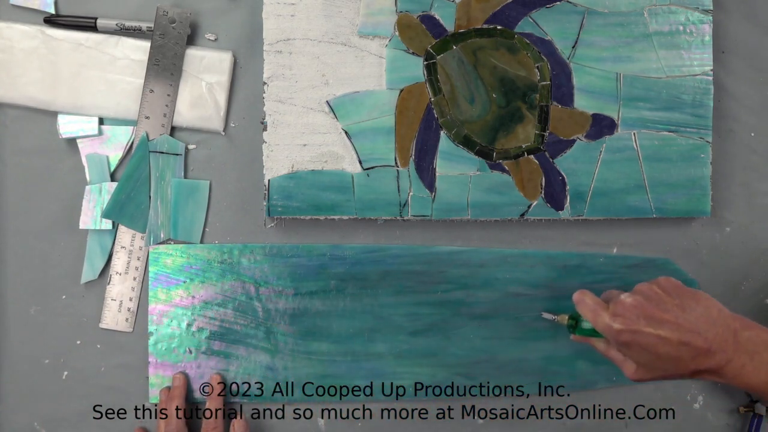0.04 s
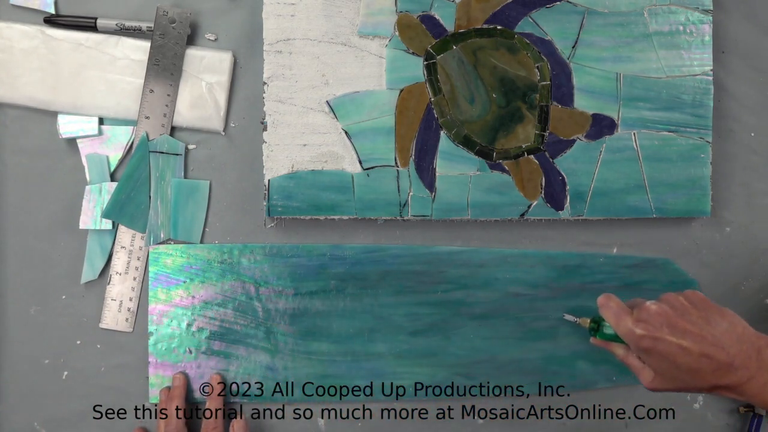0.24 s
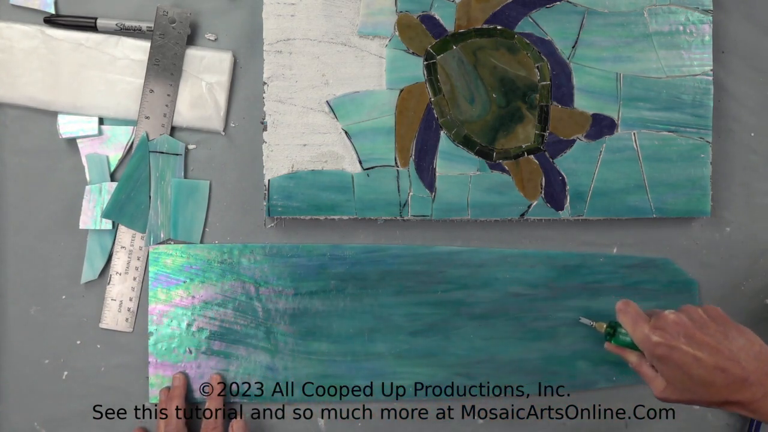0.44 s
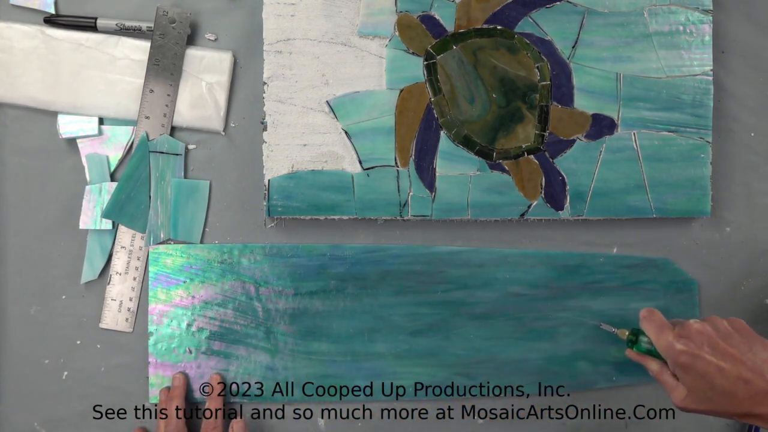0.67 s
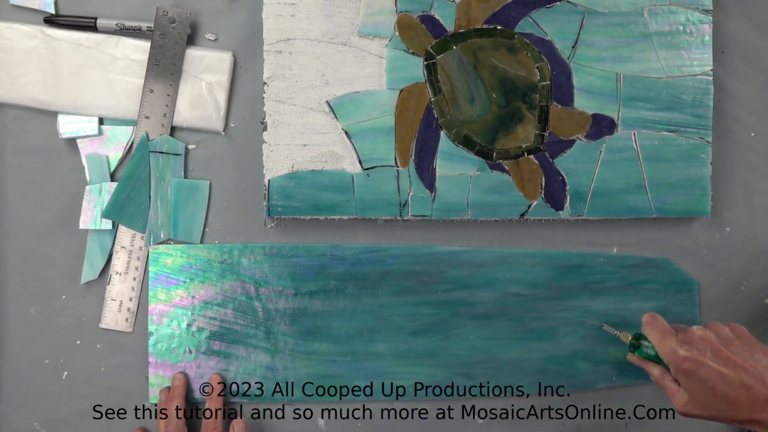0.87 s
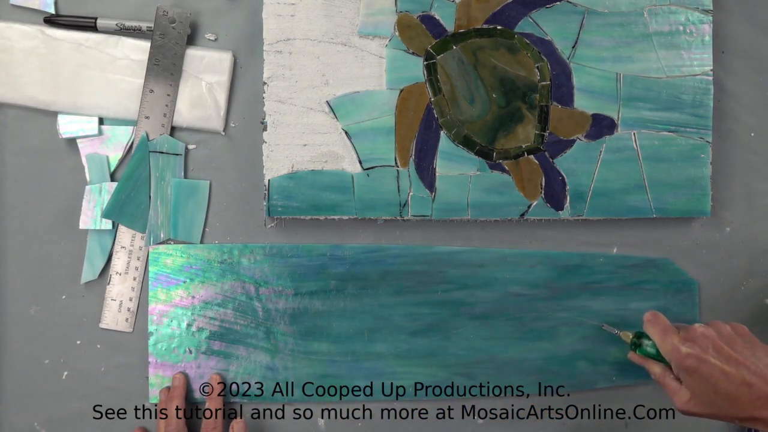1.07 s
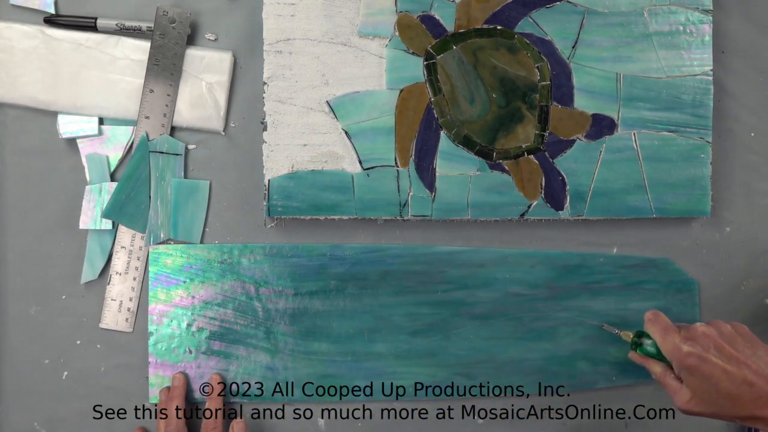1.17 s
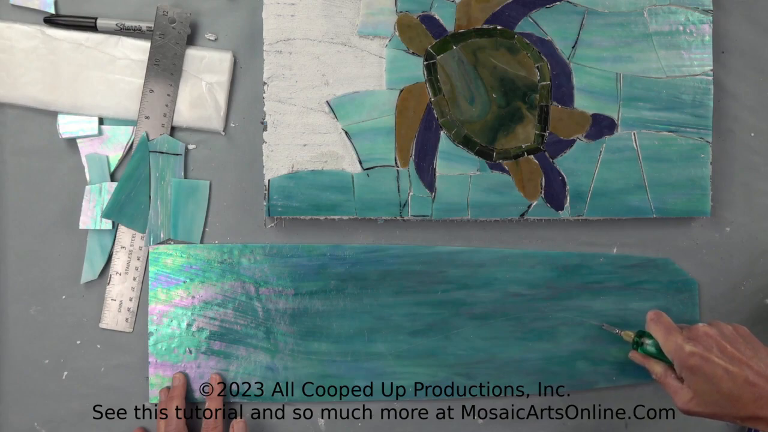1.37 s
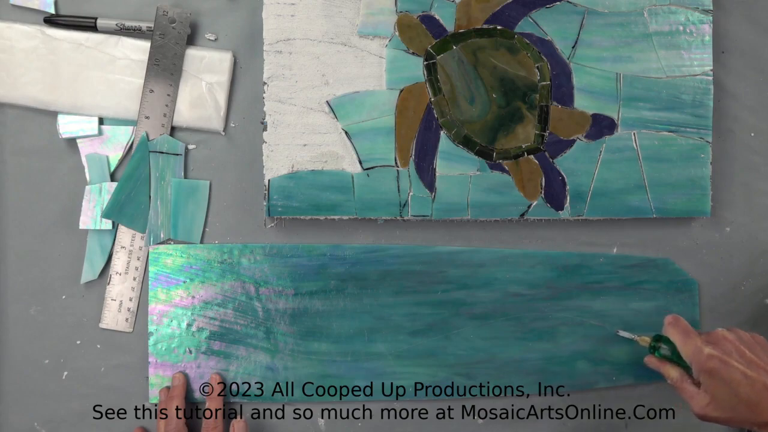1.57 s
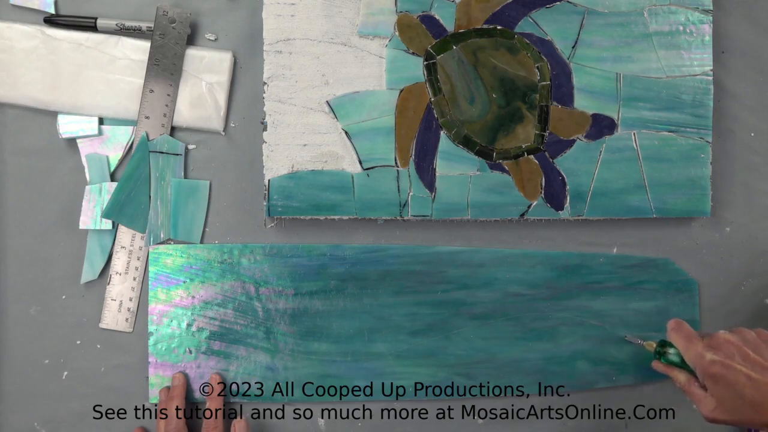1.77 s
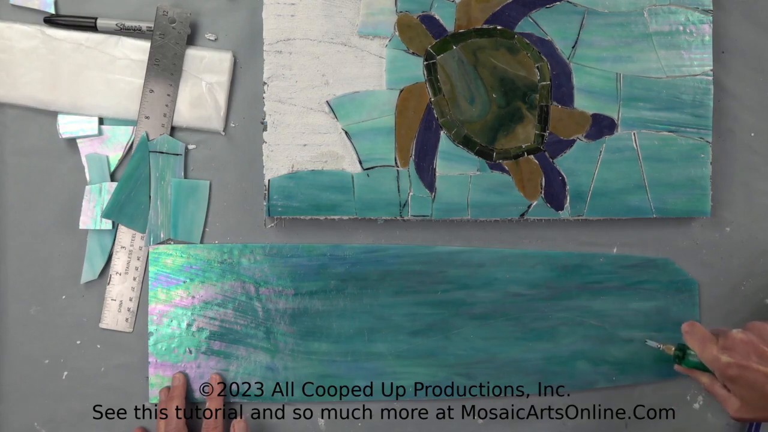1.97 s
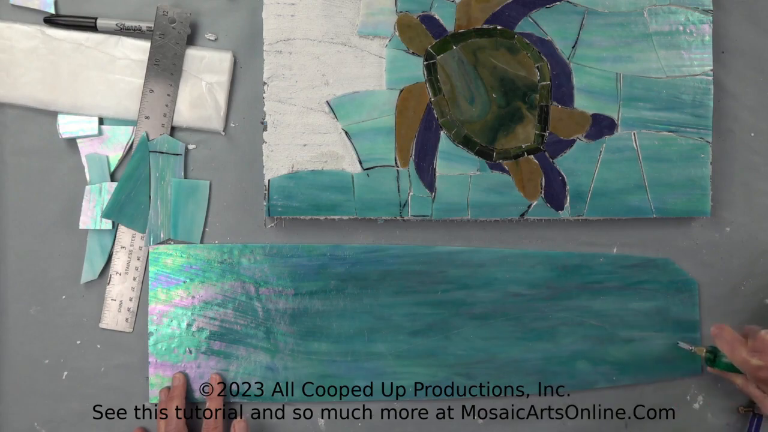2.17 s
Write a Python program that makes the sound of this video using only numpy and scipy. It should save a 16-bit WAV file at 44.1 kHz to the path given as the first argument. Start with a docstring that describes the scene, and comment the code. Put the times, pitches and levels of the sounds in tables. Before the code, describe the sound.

A cutting wheel scratches across thick glass, crackling and hissing, pausing, then scraping on with snaps

```python
"""A glass cutter's wheel is drawn over a thick textured sheet on a workbench, heard close in a small room.
The first stroke opens with fine splintering: dense random cracks ring a sheet whose modes keep shifting weight.
It snaps once over a bump, stops with a thud of the bench, and in the pause a hand slides as filtered noise.
The second stroke is short and full of snapping noise bursts; the third runs straight on from it and grows,
with gliding narrow resonances and two sine squeaks near the end. Room air and a faint hum lie beneath."""
import sys
import numpy as np
from scipy import signal
from scipy.fft import rfft, irfft
from scipy.io import wavfile

SR = 44100
rng = np.random.default_rng(int(sys.argv[2]) if len(sys.argv) > 2 else 0)


def unload_audio(sound):
    """Save the sound as a 16-bit wav file, at the path given as the first command line argument."""
    columns = np.transpose(np.atleast_2d(sound))
    # keep every value between -1 and 1, then stretch to whole-number steps
    steps = np.round(np.clip(columns, -1, 1) * 32767)
    wavfile.write(sys.argv[1], SR, steps.astype(np.int16))


N = 97902


def undb(db):
    """Decibels to gain."""
    return 10 ** (np.asarray(db) / 20)


def unit(x):
    """Scale to rms 1."""
    return x / np.sqrt(np.mean(x ** 2))


def clock():
    """Time of every sample in seconds."""
    return np.arange(N) / SR


def bins(size=8192):
    """Frequency of every spectral bin in Hz, kept above zero for logarithms."""
    return np.maximum(np.arange(size + 1) * SR / (2 * size), 1)


def curve(rows):
    """Gain along (s, dB) points, silent outside them."""
    s, db = np.array(rows, float).T
    return undb(np.interp(clock(), s, db, left=-200, right=-200))


def colour(rows):
    """Relative dB in every bin, drawn through (Hz, dB) points on a logarithmic frequency axis."""
    hz, db = np.array(rows, float).T
    return np.interp(np.log(bins()), np.log(hz), db)


def shape(x, db):
    """Minimum-phase filter with the given relative dB per bin; white noise keeps its level."""
    cepstrum = irfft(np.log(unit(undb(db)) + 1e-9))
    half = len(db) - 1
    # folding the cepstrum onto positive time makes the filter causal
    cepstrum[1:half] *= 2
    cepstrum[half + 1:] = 0
    response = irfft(np.exp(rfft(cepstrum)))[:half]
    return signal.fftconvolve(x, response)[:N]


def noise(rows):
    """Steady noise of a given colour, near rms 1."""
    return shape(rng.standard_normal(N), colour(rows))


def walk(rate):
    """Smooth random motion of rms 1, with `rate` new values a second."""
    return unit(np.interp(clock() * rate, np.arange(N), rng.standard_normal(N)))


def fade(start, decay):
    """Sudden start, then exponential decay with a time constant in seconds."""
    age = clock() - start
    return (age >= 0) * np.exp(-np.abs(age) / decay)


# Pressure of the wheel in strokes one, two and three. Each row: time in seconds, level in dB.
PRESSURE_1 = [(0, -30.5), (.07, -33), (.12, -30), (.33, -30), (.5, -29.5), (.62, -28.5), (.722, -26),
              (.738, -42), (.76, -80)]
PRESSURE_2 = [(1.541, -35.5), (1.556, -26.5), (1.566, -23.5), (1.595, -25), (1.62, -27), (1.654, -31.5),
              (1.671, -40), (1.685, -51), (1.74, -37), (1.8, -49), (1.821, -53)]
PRESSURE_3 = [(1.821, -34), (1.838, -34), (1.857, -29), (1.92, -27), (2.02, -25), (2.055, -26.5),
              (2.108, -26), (2.17, -25), (2.22, -24.5)]
# Fine splintering as the score starts. Each row: time in seconds, level in dB.
SPLINTER_LEVEL = [(0, -26), (.085, -28.5), (.125, -43), (.2, -67)]
# Colour of the splintering. Each row: frequency in Hz, relative level in dB.
SPLINTER_COLOUR = [(1900,-21),(2370,-16),(3000,-18.5),(6500,-4.5),(7300,-1),(8400,4),(9700,-4),(11000,-2.5),(11800,-14),(16000,-27)]
# Colour of the rolling wheel's rumble. Each row: frequency in Hz, relative level in dB.
RUMBLE_COLOUR = [(20, 7), (45, -18.5), (62, 7.5), (90, 4), (160, -21.5), (300, -35.5), (800, -50)]
RUMBLE_DB = -19  # against the fractures
JUDDER_DB, JUDDER_PER_S = 1.03, 130  # rms unevenness of the pressure, new values a second


def scoring():
    """Pressure drives fractures that ring the sheet from spot to spot, over the rumble of the rolling wheel."""
    out = curve(SPLINTER_LEVEL) * shape(fractures(), colour(SPLINTER_COLOUR))
    spots = places()
    for stroke, rows in enumerate([PRESSURE_1, PRESSURE_2, PRESSURE_3]):
        pressure = curve(rows) * undb(JUDDER_DB * walk(JUDDER_PER_S))
        glass = sum(shape(spot * pressure * fractures(), sheet(stroke, vary=True)) for spot in spots)
        rumble = undb(RUMBLE_DB) * pressure * noise(RUMBLE_COLOUR)
        out = out + glass + rumble
    return out


FRACTURES_PER_S, FRACTURE_SPREAD_DB = 9000, 3.5


def fractures():
    """Dense single-sample cracks of random timing, sign and size, scaled to rms 1."""
    hits = rng.random(N) < FRACTURES_PER_S / SR
    size = undb(FRACTURE_SPREAD_DB * rng.standard_normal(N))
    return unit(hits * rng.choice([-1, 1], N) * size)


PLACE_S = 0.07  # time from one spot to the next


def places(count=6):
    """Equal-power fades from one spot on the glass to the next, cycling through all of them."""
    away = (clock() / PLACE_S - np.arange(count)[:, None]) % count - 1
    return np.cos(np.pi / 2 * np.minimum(np.abs(away), 1))


# Broad response of the sheet. Each row: frequency in Hz, relative level in dB in strokes one, two and three.
SHEET_BODY = [(200,-19,-15,-14),(427,-20.5,-10,-20.5),(970,-27.5,-18,-17),(1166,-9.5,-5,-14),(1600,-11.5,-15.5,-9.5),(2440,-10,-5.5,-5.5),(3110,-10.5,-11.5,-7.5),(4030,-4,2.5,-3),(4500,-7,-6,-5.5),(8500,-8,-5.5,-9.5),(10420,-8.5,-9,-7.5),(10530,-14,-9,-11.5),(16700,-24.5,-22.5,-25.5)]
# Modes of the sheet. Each row: centre in Hz, width in Hz, then the level in dB that each mode adds
# relative to the broad response in strokes one, two and three.
SHEET_MODES = [(1236,180,6,-5,-20),(1630,33,7,13,9),(1814,230,4,13.5,8),(2300,120,8,6.5,7),(2620,64,-2,-1,8),(4390,83,3,6,3.5),(5600,120,0,5.5,2.5),(6290,130,1.5,5,5),(7167,136,6.5,5.5,11),(7830,140,5.5,4,-6),(8770,240,2,7,6.5)]
MODE_SPREAD_DB, MODE_SHIFT = 2.135, 0.00915  # random spread of level, and of centre as a fraction


def sheet(stroke, vary=False):
    """Glass response in dB: resonant power peaks on a broad body, with vary as heard at a random spot."""
    chance = vary * rng.standard_normal((len(SHEET_MODES), 2))
    peaks = 0
    for (hz, width, *db), (weight, shift) in zip(SHEET_MODES, chance):
        centre = hz * (1 + MODE_SHIFT * shift)
        power = undb(db[stroke] + MODE_SPREAD_DB * weight) ** 2
        peaks = peaks + power / (1 + (2 * (bins() - centre) / width) ** 2)
    body = colour([(hz, db[stroke]) for hz, *db in SHEET_BODY])
    return body + 10 * np.log10(1 + peaks)


# Narrow resonances of wheel on glass that climb as it moves. Each row: width in Hz, then a path
# of points holding time in seconds, frequency in Hz and level in dB.
CONTACT_PATHS = [(257.4, [(0, 2327, -39), (.16, 2450, -38), (.4, 2700, -43.5)]), (80.4, [(.1, 1950, -46),
                 (.36, 1995, -43), (.73, 2060, -43)]), (139.5, [(.14, 3540, -43), (.48, 3610, -38),
                 (.73, 3820, -38.5)]), (260, [(.52, 3850, -51), (.72, 4070, -42), (.82, 4200, -67)]),
                 (218.2, [(1.85, 3570, -57), (1.96, 3660, -36.5), (2.02, 3950, -36), (2.09, 4230, -40.5),
                 (2.22, 4380, -24)]), (167, [(1.88, 7720, -37.5), (2.02, 7870, -36.5), (2.14, 8000, -39)]),
                 (134.4, [(2.09, 8540, -44), (2.15, 8620, -32.5), (2.22, 8740, -38)])]


def contact():
    """Grit excites narrow resonances: gliding carriers whose two quadratures wander at random."""
    out = 0
    for width, rows in CONTACT_PATHS:
        s, hz, db = np.array(rows, float).T
        phase = 2 * np.pi * np.cumsum(np.interp(clock(), s, hz)) / SR
        band = walk(2 * width) * np.cos(phase) + walk(2 * width) * np.sin(phase)
        out = out + curve(np.c_[s, db]) * band
    return out


# The wheel snaps over bumps. Each row: start in seconds, level in dB, decay in seconds,
# brightness in dB per octave above 1 kHz.
BUMP_SNAPS = [(0.430, -17.5, 0.0026, -8), (1.533, -34.5, 0.0038, 1.5), (1.564, -20.5, 0.0093, -4),
              (1.6608, -18.5, 0.0074, 0), (1.661, -19, 0.0045, -2.5), (1.7278, -19, 0.0022, -2.5),
              (1.750, -17.5, 0.0036, -2.5), (1.808, -36, 0.0048, 0), (2, -22.5, 0.0074, -4.5)]
SNAP_LOW_HZ = 740  # bass falls away below this


def snaps():
    """Dense noise bursts of chipping, with little bass, ring the sheet with its second-stroke response."""
    glass = sheet(1) - 10 * np.log10(1 + (SNAP_LOW_HZ / bins()) ** 4)
    octaves = np.log2(np.maximum(bins(), 1000) / 1000)
    out = 0
    for s, db, decay, tilt in BUMP_SNAPS:
        burst = undb(db) * fade(s, decay) * rng.standard_normal(N)
        out = out + shape(burst, glass + tilt * octaves)
    return out


# Brief squeaks of the wheel. Each row: start in seconds, length in seconds, pitch in Hz, peak level in dB.
WHEEL_SQUEAKS = [(2.171, .009, 7000, -26.5), (2.186, 0.027, 4400, -26.5)]
SQUEAK_WOBBLE, WOBBLE_PER_S = 0.019, 550  # rms pitch deviation as a fraction, new values a second


def squeaks():
    """The wheel sticks and sings for a moment: a swelling sine of unsteady pitch."""
    out = 0
    for s, length, hz, db in WHEEL_SQUEAKS:
        progress = np.clip((clock() - s) / length, 0, 1)
        swell = np.sqrt(np.abs(np.sin(np.pi * progress)))
        pitch = hz * (1 + SQUEAK_WOBBLE * walk(WOBBLE_PER_S))
        out = out + undb(db) * swell * np.sin(2 * np.pi * np.cumsum(pitch) / SR)
    return out


# Light ticks of the tool being lifted and handled, and a soft finger tap at 1.245 s. Each row: start in
# seconds, level in dB, # decay in seconds, centre in Hz, distance in octaves from the centre to the -6 dB
# points.
LIGHT_TICKS = [(0.751, -38, .006, 5000, .9), (1.245, -49.5, 0.005, 790, 0.76),
               (1.2602, -47.5, 0.0025, 4630, 0.14), (1.488, -38.5, 0.0052, 6950, 0.86)]


def ticks():
    """Faint contacts as the cutter shifts in the hand, and one fingertip tap: short noise bursts, each in its
    own band."""
    out = 0
    for s, db, decay, hz, width in LIGHT_TICKS:
        burst = undb(db) * fade(s, decay) * rng.standard_normal(N)
        band = -20 * np.log10(1 + (np.log2(bins() / hz) / width) ** 2)
        out = out + shape(burst, band)
    return out


# Thuds of the bench. Each row: start in seconds, peak level of the boom in dB, level of the knock in dB.
BENCH_THUDS = [(0.637, -54, -45.5), (0.7225, -25.5, -37.5), (1.245, -60, -53), (1.562, -35, -57),
               (1.656, -37, -51), (1.86, -34.5, -66), (1.998, -37.5, -43.5)]
# Colour of the dull knock. Each row: frequency in Hz, relative level in dB.
BENCH_KNOCK_COLOUR = [(30, 0), (220, -10.5), (330, -13), (500, -17), (1000, -21.5), (3000, -87)]
BENCH_HZ, BENCH_T60_S = 63, 0.35
KNOCK_S, KNOCK_TAIL_S, KNOCK_TAIL_DB = 0.023, 0.089, -8.5  # decay constants; tail against the knock


def bench():
    """Each jolt rings the bench's low mode as a decaying sine, and gives a dull noise knock that lingers."""
    boom, jolts = 0, 0
    for s, boom_db, knock_db in BENCH_THUDS:
        swing = np.sin(2 * np.pi * BENCH_HZ * (clock() - s))
        boom = boom + undb(boom_db) * fade(s, BENCH_T60_S / np.log(1000)) * swing
        knock = fade(s, KNOCK_S) + undb(KNOCK_TAIL_DB) * fade(s, KNOCK_TAIL_S)
        jolts = jolts + undb(knock_db) * knock
    return boom + shape(jolts * rng.standard_normal(N), colour(BENCH_KNOCK_COLOUR))


# The hand slides over the glass. Each row: time in seconds, level in dB.
HAND_LEVEL = [(1.24, -78), (1.33, -62), (1.42, -55.5), (1.5, -51), (1.55, -54)]
# Colour of the slide. Each row: frequency in Hz, relative level in dB.
HAND_COLOUR = [(100, 2), (500, 6.5), (1200, -7), (2400, 4.5), (3300, -9), (4600, 1), (6000, -12),
               (15000, -19)]


def hand_slide():
    """Skin rubbing on glass: coloured noise that swells and eases."""
    return curve(HAND_LEVEL) * noise(HAND_COLOUR)


RING_T60_S, RING_DB = 0.084, -6.5  # level against the direct sound
ROOM_T60_S, ROOM_DB, ROOM_DAMP_HZ = 0.29, -5, 9100  # level before the damping low-pass


def echoes(t60, db):
    """Decaying noise response that starts 1.6 ms late, with its energy set in dB."""
    decay = fade(0.0016, t60 / np.log(1000)) * rng.standard_normal(N)
    return undb(db) * unit(decay) / np.sqrt(N)


def room(x):
    """Direct sound, a short ring of glass and bench top that differs by spot, and the room's duller tail."""
    ring = sum(signal.fftconvolve(spot * x, echoes(RING_T60_S, RING_DB))[:N] for spot in places())
    damping = signal.butter(1, ROOM_DAMP_HZ, fs=SR)
    tail = signal.lfilter(*damping, echoes(ROOM_T60_S, ROOM_DB))
    # dividing by the summed energy keeps the level
    energy = 1 + undb(RING_DB) ** 2 + np.sum(tail ** 2)
    return (x + ring + signal.fftconvolve(x, tail)[:N]) / np.sqrt(energy)


# Colour of the room's air. Each row: frequency in Hz, relative level in dB per Hz.
AIR_COLOUR = [(20,-5),(70,-5.5),(95,-13),(200,-21),(300,-25),(660,-30),(897,-23),(1300,-36),(4000,-41),(16000,-50.5)]
AIR_DB = -52
HUM_HZ, HUM_DB = 62.5, -62  # peak level


def air_and_hum():
    """Steady coloured noise for the air, and a low sine for the hum."""
    hum = undb(HUM_DB) * np.sin(2 * np.pi * HUM_HZ * clock())
    return undb(AIR_DB) * noise(AIR_COLOUR) + hum


def scene():
    """Cutter in the room, bench and hand over the air and hum, the same in both ears."""
    cutter = room(scoring() + contact() + snaps() + ticks() + squeaks())
    return np.tile(cutter + bench() + hand_slide() + air_and_hum(), (2, 1))


TOP_HZ = 16100


def record(dry):
    """The recorder cuts the top with a steep elliptic low-pass."""
    low_pass = signal.ellip(10, .2, 80, TOP_HZ, fs=SR, output="sos")  # ripple and stopband in dB
    return signal.sosfilt(low_pass, dry)


dry = scene()
out = record(dry)
unload_audio(out)
```